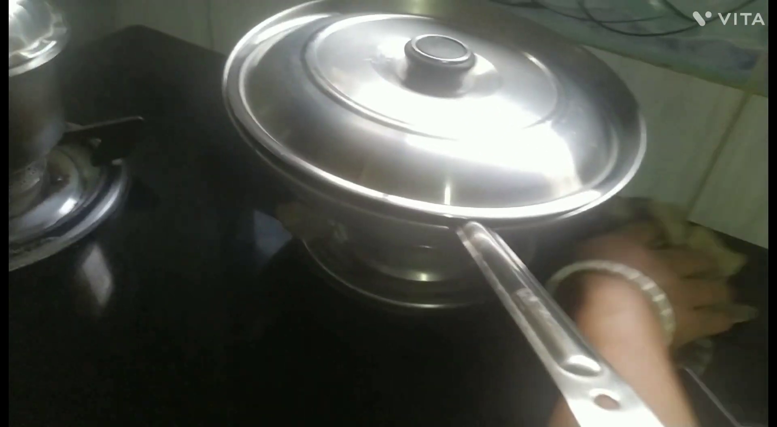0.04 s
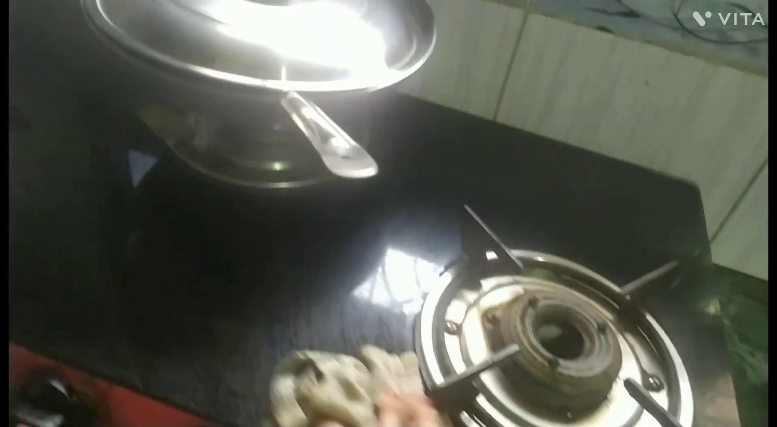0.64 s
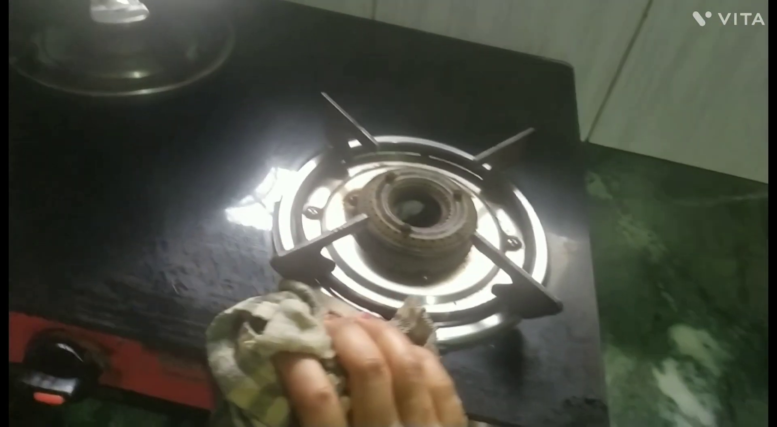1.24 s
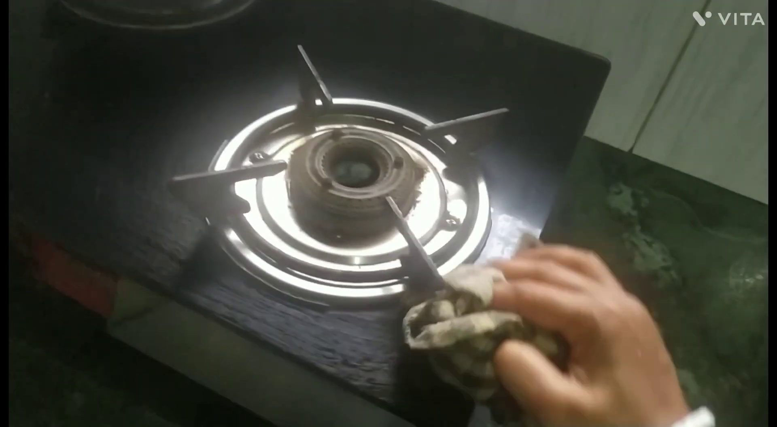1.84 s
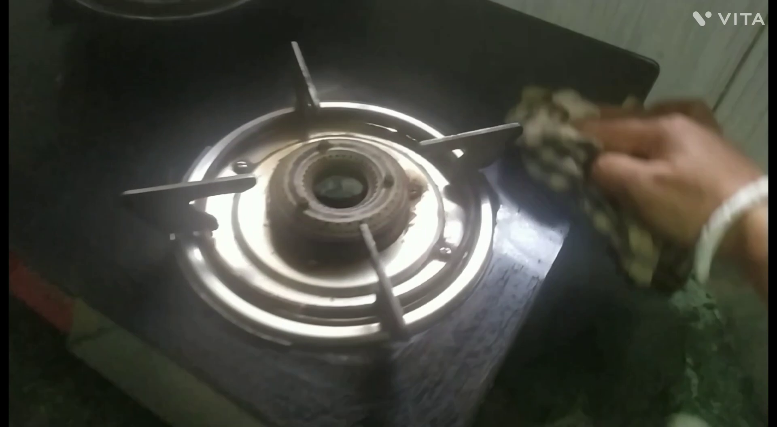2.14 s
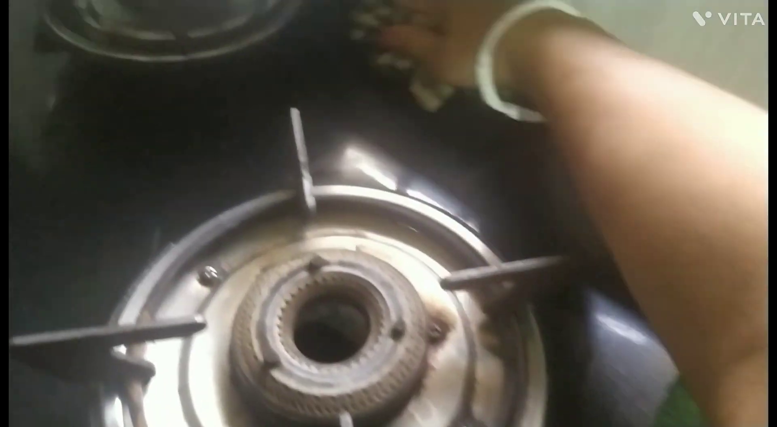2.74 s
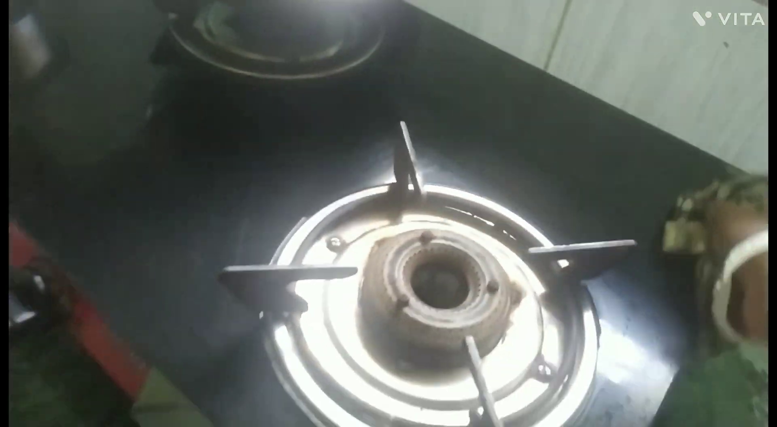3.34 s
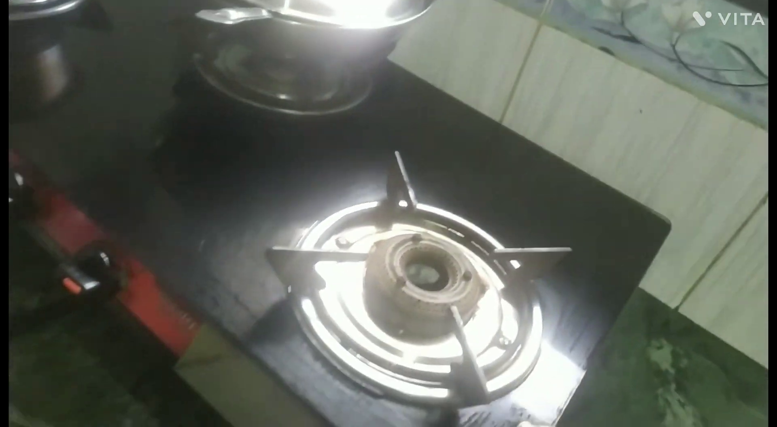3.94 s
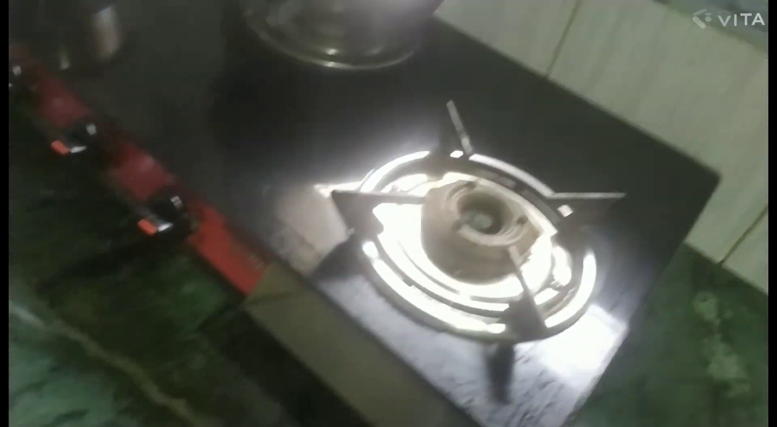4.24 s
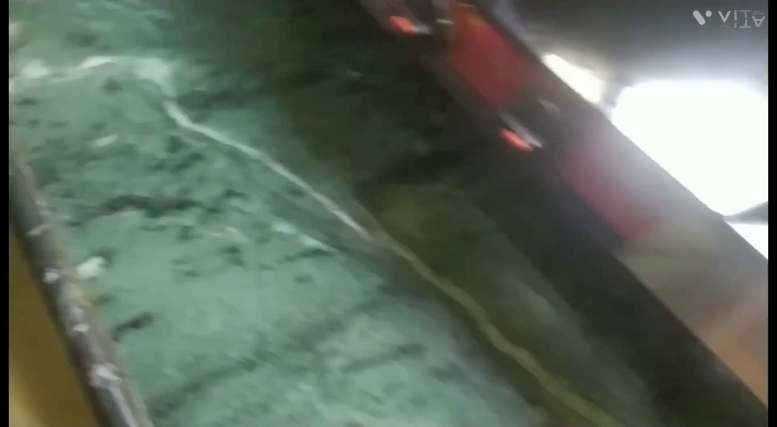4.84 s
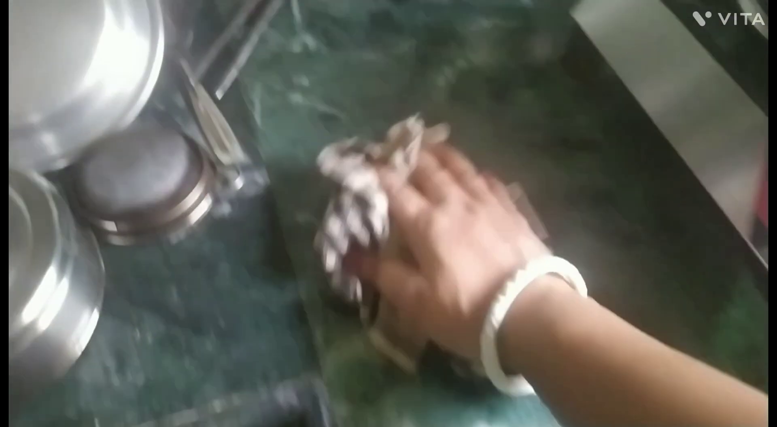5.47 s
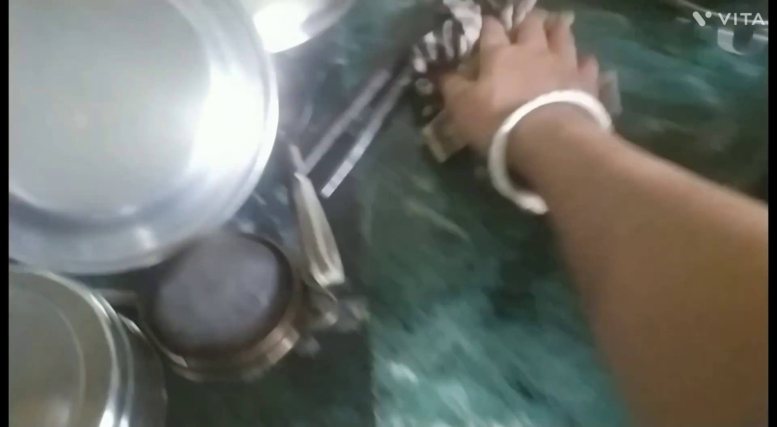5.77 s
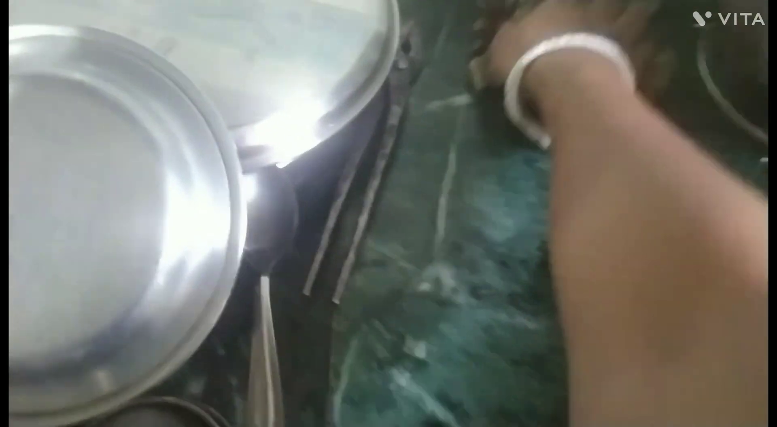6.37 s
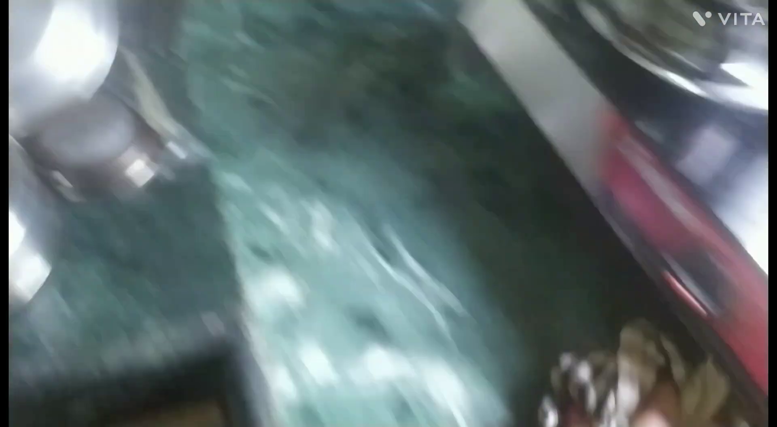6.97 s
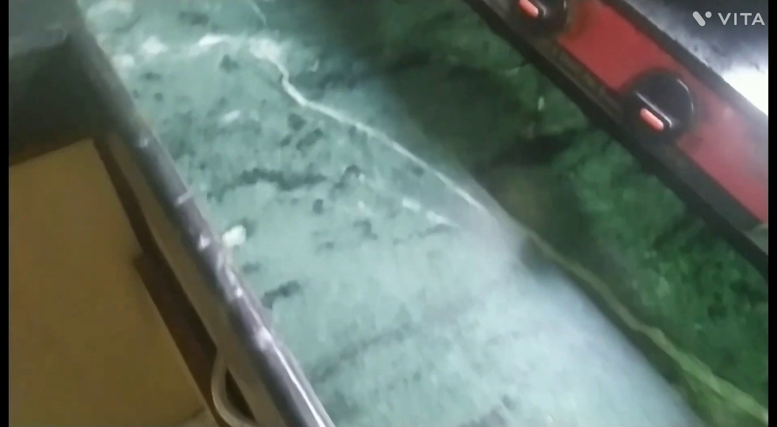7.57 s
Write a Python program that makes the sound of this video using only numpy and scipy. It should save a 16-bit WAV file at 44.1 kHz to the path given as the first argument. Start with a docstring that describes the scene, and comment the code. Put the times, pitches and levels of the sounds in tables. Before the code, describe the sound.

A damp cloth wipes a gas stove with a soft, uneven hiss, small scuffs, wet smacks and faint squeaks. It knocks the loose steel pan support, which clanks and rings briefly several times, loudest in a quick rattle. The wiping carries on to a stone counter, where cutlery clinks brightly against a plate near the end. The microphone is close, in a small tiled kitchen with a faint low rumble.

```python
"""A damp cloth wipes a gas stove, then the stone counter, close to a hand-held phone in a tiled kitchen.
The wet film hisses and the fabric rubs; folds drag in scuffs, peel off in smacks, stick and slip in
squeaks. The cloth bumps the loose steel pan support, which rocks and rings, and later some cutlery.
The passing arm fans air over the phone's two microphones. Behind it all a low rumble stands in the
small room's modes and changes as the phone moves."""
import sys
import numpy as np
from scipy import signal
from scipy.fft import rfft, irfft, next_fast_len
from scipy.io import wavfile
from scipy.ndimage import uniform_filter1d, map_coordinates

SR = 44100
rng = np.random.default_rng(int(sys.argv[2]) if len(sys.argv) > 2 else 0)


def materialize(psi):
    """Save the field psi as 16-bit PCM at rate SR to the path in sys.argv[1].

    A 1-D psi becomes a single channel; in a 2-D psi each row is a channel.
    """
    bounded = np.clip(np.atleast_2d(psi).T, -1, 1)
    quanta = np.round(bounded * 32767).astype(np.int16)
    wavfile.write(sys.argv[1], SR, quanta)


N = 335601
TIME = np.arange(N) / SR

# Levels in the tables are relative; each source applies its own gain.
# the hand's effort on the cloth, heard as hiss: time_s, level_db
HAND_EFFORT = [(0.0, -52), (0.15, -60.5), (0.39, -66), (0.55, -59.5), (0.85, -54), (1.02, -58.5),
               (1.25, -62), (1.47, -56), (1.85, -59), (2.1, -59), (2.3, -54), (2.6, -51), (2.88, -56),
               (3.02, -54.5), (3.15, -59), (3.35, -57), (3.5, -57), (3.65, -56), (3.75, -56), (3.95, -57),
               (4.25, -57), (4.5, -56), (4.8, -55), (4.97, -57), (5.22, -57.5), (5.35, -54), (5.52, -57),
               (5.67, -58), (5.85, -59.5), (6.05, -56.5), (6.12, -55.5), (6.42, -59.5), (6.6, -65),
               (6.7, -65), (6.85, -60), (7.0, -59.5), (7.1, -56), (7.21, -63.5), (7.37, -60.5), (7.52, -61),
               (7.61, -58.5)]
# spectrum of the wet film's hiss: frequency_hz, density_db
FILM_SPECTRUM = [(2500, -31), (4500, -1.5), (6000, 0), (8200, 4), (10000, 1.5), (12500, -6), (16000, -12)]
# spectrum of the fabric's rub: frequency_hz, density_db
FABRIC_SPECTRUM = [(250, -5.5), (450, 6.5), (700, 0), (1100, 3.5), (1700, -0.5), (2600, 2), (4000, -3.5),
                   (7000, -46)]
# folds dragging: start_s, length_s, start_hz, rise_octaves, half_width_ratio, level_db
FOLD_DRAGS = [(0.602, 0.014, 5200, -0.071, 0.27, -59), (0.852, 0.032, 9500, -0.17, 0.21, -54),
              (1.525, .05, 800, 0.25, 0.5, -50), (2.084, 0.035, 1310, 0.7, .25, -52),
              (2.807, 0.04, 13200, 0, .12, -60), (2.909, 0.021, 1850, 0.39, 0.24, -45),
              (3.14, .025, 11800, 0, .08, -58), (3.435, 0.047, 8800, -0.18, .2, -52),
              (3.557, 0.037, 10000, 0.13, 0.39, -57), (3.668, 0.022, 7000, -0.05, .12, -57.5),
              (3.744, .025, 8850, 0, 0.084, -53.5), (3.79, 0.06, 1300, 0.81, .27, -51.5),
              (3.996, 0.041, 1330, 0.46, 0.23, -50.5), (4.139, 0.023, 11000, 0, .2, -62),
              (4.229, 0.065, 6400, .12, 0.22, -54.5), (4.625, 0.02, 10200, 0.1, 0.33, -56.5),
              (4.939, 0.05, 7600, -0.061, 0.17, -63), (5.035, 0.024, 7800, 0.062, 0.29, -55),
              (5.274, .1, 1880, 0.13, 0.097, -60), (5.321, .1, 3350, 0.37, 0.27, -55),
              (5.63, 0.066, 10400, 0, 0.16, -58.5), (6.615, 0.059, 940, 0.068, .2, -57.5),
              (6.648, 0.064, 10000, -0.21, 1, -59), (6.67, 0.15, 3000, 0.55, 0.11, -61.5),
              (6.816, 0.18, 5000, -0.15, 0.14, -66), (7.06, 0.25, 3340, 0.7, 0.24, -59),
              (7.36, 0.048, 2700, 0.33, 0.16, -56), (7.392, 0.2, 3200, 0.48, 0.19, -59.5)]
# wet cloth peeling off: start_s, level_db, centre_hz, half_width_ratio
CLOTH_PEELS = [(0.01, -29.5, 8840, 0.18), (0.2093, -35.5, 10000, 0.31), (0.4422, -34.5, 9600, 0.31),
               (0.705, -37, 9400, 0.48), (0.784, -32, 8600, 0.43), (0.8142, -30.5, 5040, 0.21),
               (0.815, -38, 10000, .4), (1.787, -37.5, 5900, 0.18), (1.861, -34.5, 7600, 0.55),
               (2.012, -33, 8500, 0.74), (2.1307, -31, 7530, 0.16), (2.8628, -34, 7340, 0.22),
               (3.088, -33, 7550, 0.16), (3.216, -35, 10700, .35), (3.4264, -31, 8700, 0.35),
               (3.8297, -41, 11000, 0.78), (4.031, -39.5, 5100, 0.7), (4.347, -30.5, 6000, 0.63),
               (4.508, -36, 3860, 0.17), (5.029, -37, 7640, 0.55), (5.155, -31, 7800, 0.31),
               (5.157, -36, 12800, 0.42), (5.441, -36.5, 7450, 0.25), (5.576, -42, 6860, 0.49),
               (7.047, -37, 6900, 0.65)]
# cloth sticking and slipping: start_s, length_s, start_hz, rise_octaves, level_db, roughness (0-1)
CLOTH_SLIPS = [(0.385, 0.21, 4210, .01, -60.5, 0.1), (0.548, 0.16, 1790, -.04, -58, 0.35),
               (0.817, 0.017, 5100, .13, -56, 0.4), (0.827, 0.26, 1290, -0.02, -56, 0.24),
               (1.154, 0.058, 830, 0.97, -40.5, 0.4), (3.231, 0.024, 644, 0.08, -49.5, 0.2),
               (5.703, 0.05, 1410, -.16, -54, 0.35), (7.03, 0.055, 1930, 0.28, -46, 0.36),
               (7.333, 0.28, 3290, 0.02, -57, 0.3)]

# bumps on the pan support; each point of contact wakes two resonances, a softer one lacks the top:
# start_s, level_db, treble_db, bass_db, first_hz, second_hz, top_hz
SUPPORT_BUMPS = [(0.0, -40, -9, 25.5, 490, 302, 14000), (0.755, -48.5, -34, 13, 1080, 690, 12000),
                 (0.883, -44.5, 5, 18, 660, 1250, 11900), (0.927, -42.5, 3, 8, 1120, 770, 11700),
                 (1.011, -53, -7, -11, 2600, 1300, 12000), (1.206, -52, 11, -9, 2010, 2920, 5000),
                 (1.579, -23, 10, 3, 1040, 1810, 11000), (1.616, -35, -34, 6, 960, 1870, 10000),
                 (1.957, -41, -15, 0, 1880, 820, 6000), (2.182, -35.5, -32, 12, 660, 1500, 8000),
                 (2.203, -36, -3, 5, 1150, 600, 12000), (2.2297, -16, 0.5, -6.5, 570, 1250, 15500),
                 (2.263, -16.5, 2.5, -6, 1280, 845, 14000), (2.276, -20.5, -3, -3, 970, 1480, 12000),
                 (2.353, -37.5, 9, -1, 930, 1200, 11000), (2.653, -21, -6, -5, 490, 2050, 12500),
                 (2.678, -33, 9, -6, 980, 1600, 12000)]
# the loose support rocks at each bump (sharp tick, full blow, rebound): delay_s, level_db, treble_db
SUPPORT_ROCKING = [(0, -2.5, 7.5), (.0035, -1.5, -9), (.014, -11, 8)]
# modes rung by each bump: the lowest, near 208 Hz, is a room mode the blow sets off; the rest belong to the
# steel support on its drip tray: pitch_hz, level_db, t60_s
SUPPORT_MODES = [(208.1, -3, 0.53), (278, 2, 0.17), (502.3, 3, 0.22), (558, -5, 0.35), (830, -15.5, 0.13),
                 (852, 4.5, 0.23), (948, 5, 0.15), (1019, 8.5, 0.11), (1150, 8.5, 0.072),
                 (1200, -0.5, 0.16), (1503, 11.5, 0.04), (1930, -6, 0.42), (2060, -26, 0.12)]
# spectrum of the support's dense ring: frequency_hz, density_db
SUPPORT_SPECTRUM = [(88, -44), (160, -74), (220, -5), (390, -9.5), (500, -9), (689, -10.5), (870, -2),
                    (1300, -12), (1870, -8), (2800, -11), (3600, -11), (5400, -18.5), (6020, -20.5),
                    (6910, -17.5), (10400, -19), (13700, -27.5), (14800, -21), (16000, -42)]
# cutlery pushed against a plate:
# start_s, level_db, treble_db, bass_db, first_hz, second_hz, top_hz, left_minus_right_db
CUTLERY_BUMPS = [(6.1522, -16.5, -2, -2.5, 8960, 11600, 15800, 5.5),
                 (6.156, -26.5, -21, 2, 4260, 4570, 7500, -2),
                 (6.174, -19.5, -9, 8.5, 8000, 2780, 16000, 4),
                 (6.2615, -30, -1, 18.5, 9400, 7200, 15000, 2.5),
                 (6.295, -42.5, -3, 35, 7300, 7900, 14000, -1)]
# modes of the cutlery: pitch_hz, level_db, t60_s
CUTLERY_MODES = [(515, -12.5, 0.24), (2130, -5, 0.09), (2380, -10, 0.09), (3970, -4, 0.056),
                 (4620, 4, 0.065), (6500, -1, 0.16), (6740, -3, 0.18), (7040, -4, 0.24), (8600, 15, 0.083),
                 (8280, 12, 0.074), (9700, 13, 0.067), (9500, 17, 0.11), (9800, 16, 0.088),
                 (12270, 0, 0.26), (13100, 8, 0.2)]
# spectrum of the cutlery's dense ring: frequency_hz, density_db
CUTLERY_SPECTRUM = [(200, -30), (500, -15.5), (700, -22.5), (2000, -19.5), (2700, -14), (3400, -17.5),
                    (4300, -8.5), (5150, -14), (8500, -5.5), (9700, -7.5), (10700, -12), (11500, -7),
                    (13500, -13), (15500, -7)]

# air from the passing arm at the microphone ports: centre_s, pitch_hz, level_db, half_length_s
ARM_PUFFS = [(3.666, 62.4, -46, 0.014), (3.725, 65, -41.5, 0.018), (3.786, 76.5, -34, 0.015),
             (3.879, 85.5, -42.5, 0.013), (6.364, 93.6, -45.5, 0.067)]
# strength of the two sets of room modes where the phone is held: time_s, stove_db, counter_db
RUMBLE_LEVELS = [(0.0, -61, -54.5), (0.95, -49.5, -59.5), (1.35, -50, -60), (2.15, -49.5, -68),
                 (2.7, -44.5, -57), (3.55, -45, -58), (4.2, -48.5, -56), (5.0, -47, -62), (5.7, -52, -48),
                 (6.35, -57, -43.5), (6.8, -65, -50.5), (7.1, -57, -46.5), (7.61, -53, -66)]
# room modes heard at the stove: centre_hz, width_hz, level_db
ROOM_MODES_AT_STOVE = [(64.7, 11.4, 3.5), (115, 7.4, -1), (209.1, 12.2, -6)]
# room modes heard at the counter: centre_hz, width_hz, level_db
ROOM_MODES_AT_COUNTER = [(82.3, 19, 7.5), (97, 5.5, -18), (145, 85, -6)]
# spectrum of the room's hush: frequency_hz, density_db
HUSH_SPECTRUM = [(15, -28), (25, -24), (59, 2), (92, -5.5), (130, 0), (161, -23), (200, -7.5), (344, -11),
                 (463, -11.5), (754, -23), (2410, -24.5), (5880, -34), (8590, -45.5), (14800, -37),
                 (16000, -50)]
# decay between the tiled walls: frequency_hz, t60_s
KITCHEN_DECAY = [(200, 0.53), (900, 0.36), (3000, 0.39), (8000, 0.29), (15000, 0.11)]
# likeness of diffuse sound at the two microphones: frequency_hz, correlation
MIC_CORRELATION = [(60, .91), (130, .94), (290, .92), (640, .7), (1400, .05), (3100, -.05), (6800, .55),
                   (15000, .85)]


def wiping(easy_stroke_db=-56, rub_db=-57, rub_growth=0.84, stone_from_s=5.1, crossfade_s=0.61):
    """Close up, the wet film hisses and the fabric rubs unevenly; both follow the hand's effort."""
    effort_db, = curves(HAND_EFFORT)
    on_stone = np.clip((TIME - stone_from_s) / crossfade_s, 0, 1)
    film = diffuse(N, lambda f: amp(along(FILM_SPECTRUM, f)))
    # each band swells on its own as the folds shift
    hiss = sum(band * amp(2.5 * wander(14)) for band in bands(film, FILM_SPECTRUM))
    # polished stone gives a finer, brighter hiss than the stove top
    stone_hiss = shape(hiss, lambda f: amp(5.5 * resonance(f, 14200, 2300)))
    hiss = (1 - on_stone) * hiss + on_stone * stone_hiss
    rub = diffuse(N, lambda f: amp(along(FABRIC_SPECTRUM, f)))
    rub *= amp(1.8 * wander(25) - 3 * on_stone)  # solid stone has less body than the hollow stove
    rub *= amp(rub_db + rub_growth * (effort_db - easy_stroke_db))
    hiss *= amp(effort_db + 2.46 * wander(3.7))
    return pan(1) * (hiss + rub)


def scuffs(gain_db=-1, grip_db=3, attack_s=0.0073, release_s=0.018):
    """Folds drag with uneven grip, close on the right: a rasp whose centre follows the hand's speed."""
    out = np.zeros((1, N))
    for start_s, length_s, start_hz, octaves, width, db in FOLD_DRAGS:
        t = np.arange(int(length_s * SR)) / SR
        travel = np.cumsum(2 ** (octaves * t / length_s))
        grain = shape(rng.standard_normal(SR // 2), lambda f: resonance(f, start_hz, width * start_hz))
        rasp = map_coordinates(grain, [travel], mode="mirror")
        pressure = np.minimum(t / attack_s, 1) * np.minimum((length_s - t) / release_s, 1)
        grip = amp(grip_db * wander(120, len(t)))
        add(out, start_s, unit(rasp * pressure * grip)[None] * amp(db + gain_db))
    return from_right(out[0])


def smacks(gain_db=-5, snap_t60=0.027, fizz_t60=0.32, fizz_db=-11, rise_s=0.00093):
    """A broad, bright snap as the wet cloth lets go, and a narrower fizz after it."""
    out, t = np.zeros((2, N)), np.arange(SR // 5) / SR
    onset = 1 - np.exp(-t / rise_s)
    for start_s, db, hz, width in CLOTH_PEELS:
        snap = diffuse(len(t), lambda f: resonance(f, hz, width * hz) * np.minimum(f / hz, 1))
        snap *= fade(t, snap_t60)
        fizz = diffuse(len(t), lambda f: resonance(f, hz, 0.51 * width * hz))
        fizz *= fade(t, fizz_t60) * amp(fizz_db + 2.5 * wander(120, len(t)))
        add(out, start_s, (snap + fizz) * onset * amp(db + gain_db))
    return out


def squeaks(gain_db=-6, octave_db=-18, scrape_db=-6, grip_db=4, waver_db=3.5):
    """Thin stick-slip tones: pitch follows the hand's speed; uneven grip adds roughness and scrape."""
    out = np.zeros((2, N))
    for start_s, length_s, start_hz, octaves, db, roughness in CLOTH_SLIPS:
        n, end_hz = int(length_s * SR), start_hz * 2 ** octaves
        jitter = 0.15 * roughness * wander(900, n)
        waver = 0.012 * wander(45, n)
        hz = np.linspace(start_hz, end_hz, n) * (1 + jitter + waver)
        mic_phase = np.array([[0], [rng.standard_normal()]])
        phase = 2 * np.pi * np.cumsum(hz) / SR + mic_phase
        tone = np.sin(phase) + amp(octave_db) * np.sin(2 * phase)
        scrape = roughness * amp(scrape_db) * diffuse(n, lambda f: resonance(f, end_hz, end_hz / 2))
        flutter = amp(roughness * grip_db * wander(70, n) + waver_db * wander(45, n))
        squeak = (tone + scrape) * flutter * signal.windows.tukey(n, 0.5)
        add(out, start_s, unit(squeak) * amp(db + gain_db))
    return out


def pan_support(left_db=2.5):
    """The loose steel support, a little to the left, rocks on its drip tray: three contacts a bump."""
    bumps = [(*bump, left_db) for bump in SUPPORT_BUMPS]
    return struck_steel(bumps, SUPPORT_ROCKING, SUPPORT_MODES, SUPPORT_SPECTRUM,
                        modes_db=-8, sheet_t60=0.1, rise_s=0.00022, treble_hz=4600, bass_hz=496,
                        first_db=8.5, second_db=5, width=0.12)


def cutlery(gain_db=-2):
    """Cutlery meets a plate in bright clinks, one contact each."""
    single_contact = [(0, 0, 0)]
    clinks = struck_steel(CUTLERY_BUMPS, single_contact, CUTLERY_MODES, CUTLERY_SPECTRUM,
                          modes_db=-5.5, sheet_t60=0.13, rise_s=0.0006, treble_hz=6000, bass_hz=2490,
                          first_db=5, second_db=3.5, width=0.13)
    return amp(gain_db) * clinks


def struck_steel(bumps, contacts, modes, spectrum, modes_db, sheet_t60, rise_s, treble_hz, bass_hz,
                 first_db, second_db, width, ripple_db=7, scatter_db=2, shadow_hz=900):
    """Each contact builds up fast, then leaves a dense sheet-metal ring and a few clear modes."""
    out, t = np.zeros((2, N)), np.arange(SR // 2) / SR
    onset = 1 - np.exp(-t / rise_s)
    ripple_hz = np.arange(5800, 17000, 70)
    for start_s, db, treble_db, bass_db, first_hz, second_hz, top_hz, left_db in bumps:
        # a random ripple above 5.8 kHz, drawn anew for each bump, colours the treble
        heights = np.append(0, rng.uniform(-1, 1, len(ripple_hz) - 1))
        ripple = np.column_stack([ripple_hz, ripple_db * heights])
        for delay_s, force_db, tick_db in contacts:
            def touch(f):
                """How strongly this contact drives each frequency."""
                treble = (treble_db + tick_db) * f ** 2 / (f ** 2 + treble_hz ** 2)
                bass = bass_db * bass_hz ** 2 / (f ** 2 + bass_hz ** 2)
                first = first_db * resonance(f, first_hz, width * first_hz)
                second = second_db * resonance(f, second_hz, width * second_hz)
                return amp(treble + bass + first + second) / np.sqrt(1 + (f / top_hz) ** 10)

            sheet = diffuse(len(t), lambda f: touch(f) * amp(along(spectrum, f) + along(ripple, f)))
            sheet *= fade(t, sheet_t60)
            ring = 0
            for hz, mode_db, t60 in modes:
                offset, lag, strength = rng.standard_normal(3)
                # short waves reach the two microphones out of step
                phase = np.pi * offset + np.array([[0], [lag * (1 - along(MIC_CORRELATION, hz))]])
                gain = amp(mode_db + scatter_db * strength) * touch(hz)
                ring += gain * np.sin(2 * np.pi * hz * t + phase) * fade(t, t60)
            blow = (unit_energy(sheet) + amp(modes_db) * unit_energy(ring)) * onset
            blow = unit_energy(blow) * np.sqrt(SR / 50)  # the energy of 20 ms at rms 1
            # the phone's body shades the far microphone, but not in the bass
            blow = shape(blow, lambda f: pan(left_db) ** (f ** 2 / (f ** 2 + shadow_hz ** 2)))
            add(out, start_s + delay_s, blow * amp(db + force_db))
    return out


def arm_puffs(eddy_db=-7, eddy_hz=110, left_db=-12.5):
    """The arm fans air over the ports, mostly the right one: soft low thuds with fluttering eddies."""
    eddies = shape(rng.standard_normal(N), lambda f: resonance(f, eddy_hz, eddy_hz / 2))
    eddies = amp(eddy_db) * unit(eddies)
    out = 0
    for centre_s, hz, db, half_length_s in ARM_PUFFS:
        t = TIME - centre_s
        swell = amp(db) * np.exp(-(t / half_length_s) ** 2)
        out += swell * (np.sin(2 * np.pi * hz * t) + eddies)
    return pan(left_db) * out


def room_rumble(hush_db=-52, hush_growth=0.05, counter_trim_db=-1):
    """Distant noise drives low room modes under a hush; the phone moves between two sets of them."""
    stove_db, counter_db = curves(RUMBLE_LEVELS)
    out = diffuse(N, lambda f: amp(along(HUSH_SPECTRUM, f)))
    out *= amp(hush_db + hush_growth * (stove_db - stove_db.mean()))
    places = (ROOM_MODES_AT_STOVE, stove_db), (ROOM_MODES_AT_COUNTER, counter_db + counter_trim_db)
    for modes, level_db in places:
        drone = diffuse(N, lambda f: sum(amp(db) * resonance(f, hz, wide / 2) for hz, wide, db in modes))
        # the drive is steady over a quarter of a second
        running_rms = np.sqrt(uniform_filter1d(np.mean(drone ** 2, axis=0), SR // 4))
        out += drone / running_rms * amp(level_db)
    return out


def kitchen(dry, wet_db, gap_s=0.00058):
    """Close tiled walls answer the direct sound with a dense tail whose treble dies first."""
    t = np.arange(int(0.7 * SR)) / SR
    noise_bands = bands(diffuse(len(t)), KITCHEN_DECAY)
    tail = sum(band * fade(t, t60) for band, (_, t60) in zip(noise_bands, KITCHEN_DECAY))
    tail = unit_energy(tail * np.clip(t / gap_s - 1, 0, 1))
    return dry + amp(wet_db) * signal.fftconvolve(dry, tail, axes=1)[:, :N]


def from_right(x, lag_s=0.00042, lag_below_hz=5500):
    """The left channel lags below lag_below_hz, so the rasp sits right; the treble stays centred."""
    left = shape(x, lambda f: np.exp(-2j * np.pi * f * lag_s * (f < lag_below_hz)))
    return np.array([left, x])


def diffuse(n, gain=np.ones_like):
    """Coloured noise of rms 1 as two close microphones hear it."""
    mid, side = rng.standard_normal((2, n))
    mid = shape(mid, lambda f: gain(f) * np.sqrt(1 + along(MIC_CORRELATION, f)))
    side = shape(side, lambda f: gain(f) * np.sqrt(1 - along(MIC_CORRELATION, f)))
    return unit(np.array([mid + side, mid - side]))


def pan(left_db):
    """Microphone gains with the left one left_db above the right."""
    return amp(np.array([[left_db], [-left_db]]) / 2)


def wander(rate_hz, n=N):
    """Smooth random drift of spread 1 that changes about rate_hz times a second."""
    return unit(shape(rng.standard_normal(n + SR // 4), lambda f: np.exp(-(f / rate_hz) ** 2)))[:n]


def shape(x, gain):
    """Filter by a gain that is a function of frequency."""
    n = x.shape[-1]
    size = next_fast_len(n)
    f = np.maximum(np.fft.rfftfreq(size, 1 / SR), 1)
    return irfft(rfft(x, size) * gain(f), size)[..., :n]


def bands(x, table):
    """Split x into overlapping bands, one at each frequency of a table."""
    for centre_hz, _ in table:
        share = [(hz, hz == centre_hz) for hz, _ in table]
        yield shape(x, lambda f: along(share, f))


def resonance(f, hz, half_width_hz):
    """Bell-shaped peak of height 1."""
    return 1 / (1 + ((f - hz) / half_width_hz) ** 2)


def along(points, f):
    """Read (frequency_hz, value) points on a log-frequency axis."""
    hz, value = np.transpose(points)
    return np.interp(np.log(f), np.log(hz), value)


def curves(table):
    """The value columns of a timed table at every sample."""
    time_s, *columns = np.transpose(table)
    return [np.interp(TIME, time_s, column) for column in columns]


def fade(t, t60):
    """Exponential decay by 60 dB in t60 seconds."""
    return np.exp(-np.log(1000) * t / t60)


def amp(db):
    """Decibels to gain."""
    return 10 ** (np.asarray(db) / 20)


def unit(x):
    """Scale to rms 1."""
    return x / np.sqrt(np.mean(x ** 2))


def unit_energy(x):
    """Scale to a mean energy of 1 per channel."""
    return unit(x) / np.sqrt(x.shape[-1])


def add(out, start_s, x):
    """Mix x in from start_s."""
    i = max(int(start_s * SR), 0)
    out[:, i:i + x.shape[-1]] += x[:, :N - i]


def scene():
    """Cloth and steel close to the phone, the kitchen's rumble behind them."""
    metal = kitchen(pan_support(), wet_db=-5) + kitchen(cutlery(), wet_db=-8)
    cloth = wiping() + kitchen(scuffs(), wet_db=-3)
    cloth += kitchen(smacks(), wet_db=-17) + kitchen(squeaks(), wet_db=-3.5)
    return cloth + metal + room_rumble() + arm_puffs()


def record(dry, bottom_hz=32, top_hz=16000):
    """The phone cuts the deepest bass and the top."""
    low_cut = signal.butter(2, bottom_hz, "high", fs=SR, output="sos")
    high_cut = signal.ellip(10, 0.2, 80, top_hz, fs=SR, output="sos")
    return signal.sosfilt(high_cut, signal.sosfilt(low_cut, dry))


dry = scene()
out = record(dry)
materialize(out)
```